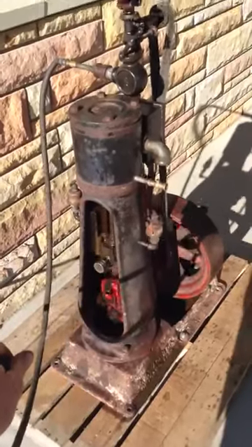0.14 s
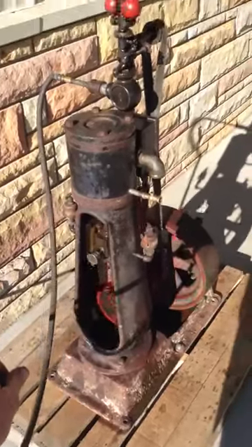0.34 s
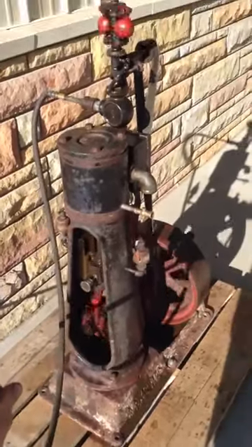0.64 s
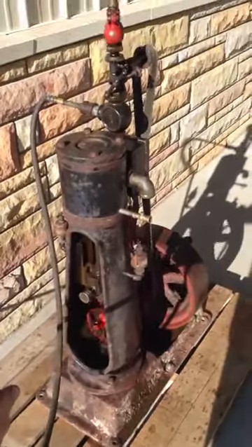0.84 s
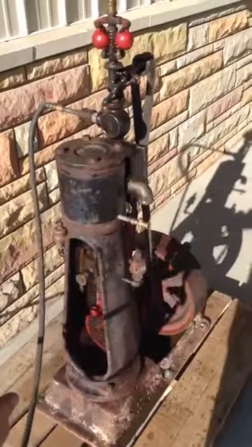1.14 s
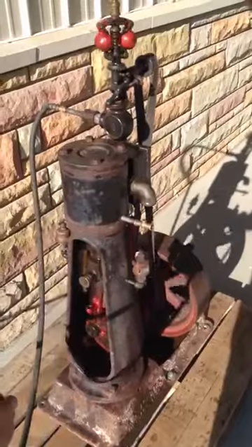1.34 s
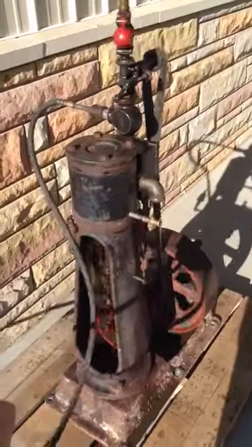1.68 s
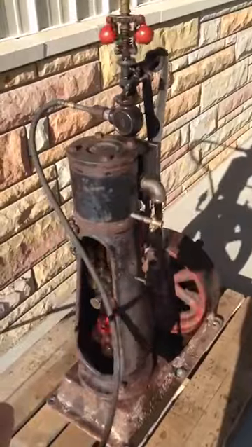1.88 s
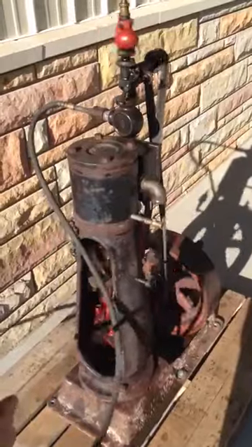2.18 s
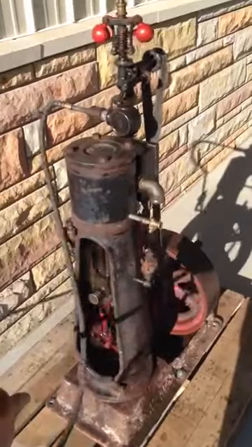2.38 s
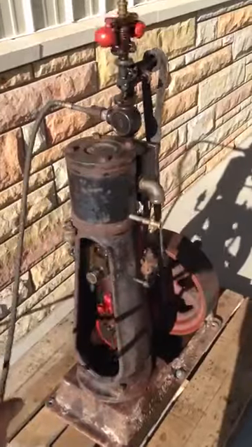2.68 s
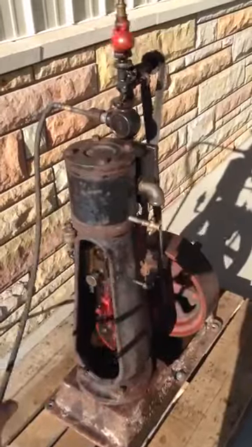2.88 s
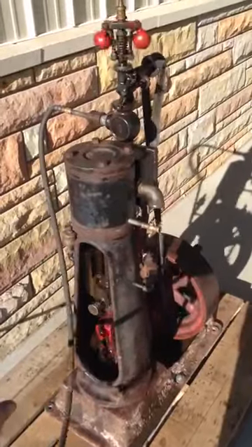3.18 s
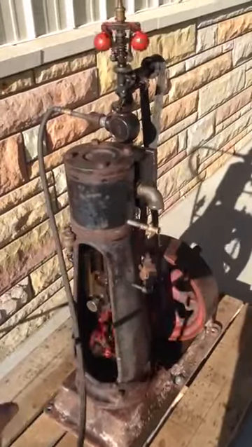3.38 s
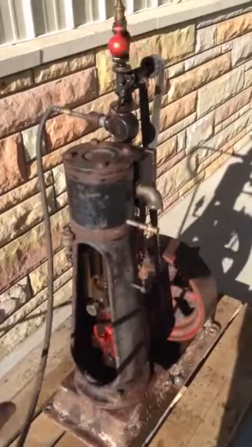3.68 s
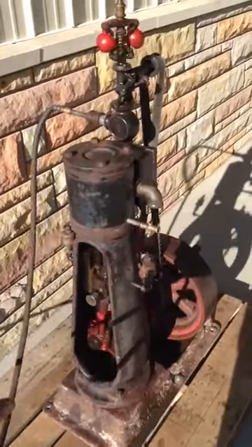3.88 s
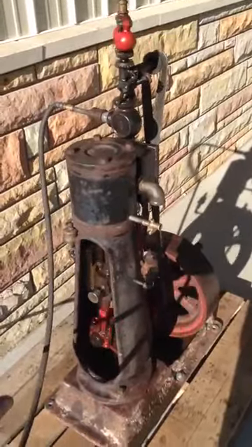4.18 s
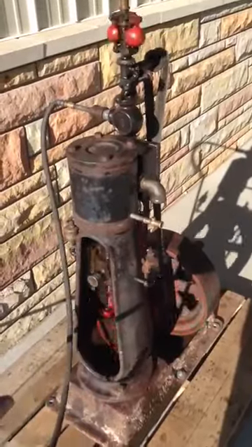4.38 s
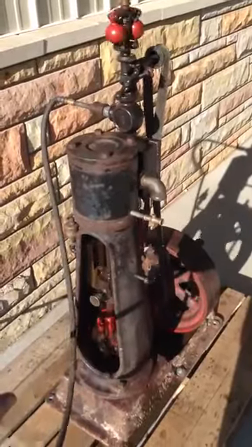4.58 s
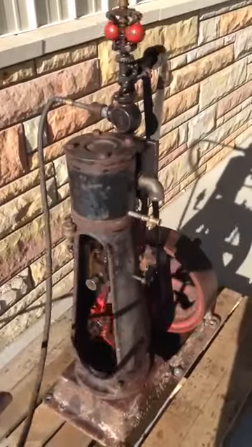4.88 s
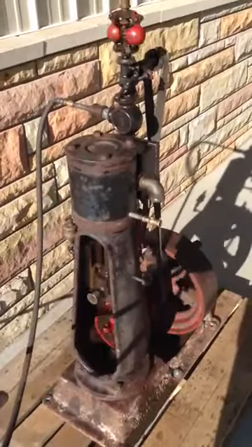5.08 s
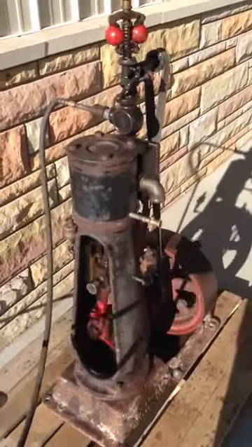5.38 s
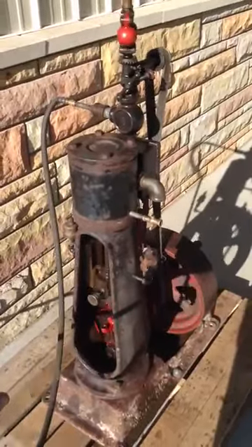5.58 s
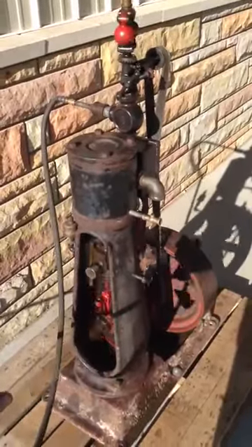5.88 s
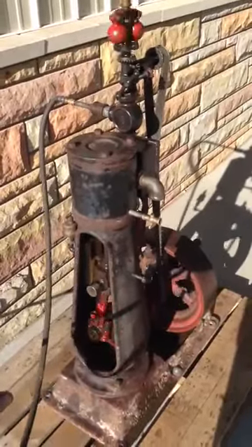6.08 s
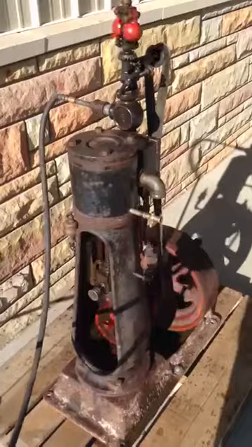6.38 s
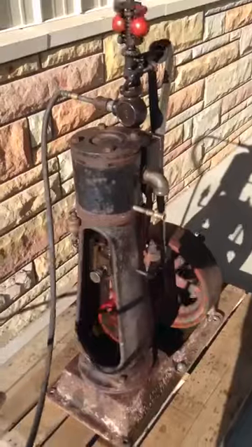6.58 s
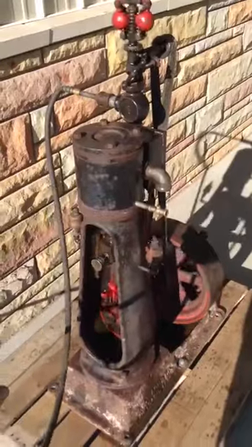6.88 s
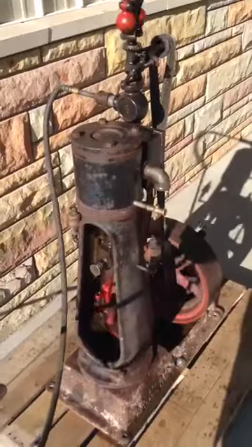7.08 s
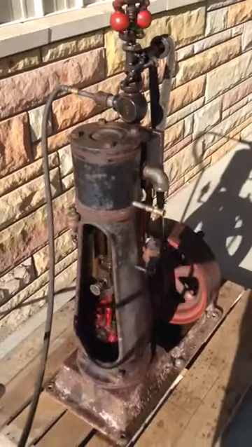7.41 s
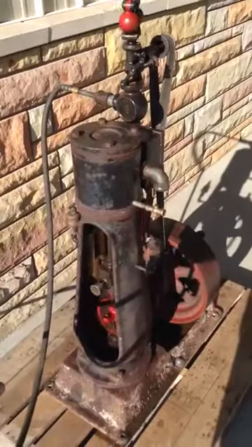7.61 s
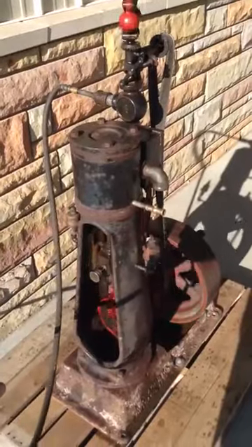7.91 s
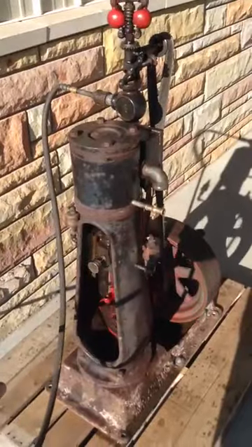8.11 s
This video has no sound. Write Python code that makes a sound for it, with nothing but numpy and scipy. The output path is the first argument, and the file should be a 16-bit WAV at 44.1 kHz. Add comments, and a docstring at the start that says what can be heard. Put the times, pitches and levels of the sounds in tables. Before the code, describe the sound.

An old single-cylinder steam engine turns over slowly with soft puffs and a thin leaking hiss. The hiss swells into a loud rush, and about eight sharp exhaust blasts spin it up fast. It then coasts, swishing, puffing and thumping ever more slowly, with a few metallic knocks and faint squeals. The leak hisses again near the end. It is heard close by, outdoors, over a faint low hum.

```python
"""An old upright single-cylinder steam engine idles over, is spun up by eight loud exhaust blasts, and coasts.
Each blast is a turbulent jet filtered by the resonances of the exhaust pipe. The piston pumps air through the
ports, swishing, puffing and thumping ever more slowly; the valve gear clacks and squeals. A leak at the valve
hisses, fades during the coast and returns. The engine's wooden pallet, the ground and a stone wall reflect the
sound, over the low hum of the yard."""
import sys
import numpy as np
from scipy import signal
from scipy.fft import rfft, irfft
from scipy.io import wavfile
from scipy.ndimage import uniform_filter1d, minimum_filter1d

SR = 44100
rng = np.random.default_rng(int(sys.argv[2]) if len(sys.argv) > 2 else 0)


def wav_out(sig):
    """Save sig, one row per channel (or a flat mono array), as 16-bit PCM at SR to the path in sys.argv[1]."""
    wavfile.write(sys.argv[1], SR, np.round(np.clip(np.atleast_2d(sig).T, -1, 1) * 32767).astype(np.int16))


N = 363825
TIME = np.arange(N) / SR
FREQS = np.maximum(np.arange(N // 2 + 1) * SR / N, 1)
REFERENCE_SPEED = 4  # turns per second

# Broad spectrum of flow through the ports. Each row: frequency in Hz, level in dB.
PORT_SPECTRUM = [(30, -42), (70, -10), (130, -3), (200, 6), (340, -3), (470, 5.5), (750, -5), (1150, 0.5),
                 (1550, -6.5), (1900, 1), (2650, -8), (3300, 4), (4400, -2.5), (5900, -7), (10300, -9),
                 (14500, -6)]
# Resonances of the ports. Each row: frequency in Hz, width in Hz, lift in dB.
PORT_MODES = [(323, 26, 7.7), (1746, 41, 12.3), (2064, 68, 8.2), (2290, 56, 8.1), (3045, 82, 4.6),
              (3510, 31, 1.8), (3660, 140, 1.8), (4010, 34, 4.2), (4900, 82, 11.5), (5278, 48, 11),
              (5750, 65, 2), (6300, 270, 4.9), (7690, 126, 9.6), (8250, 90, 4.6), (8430, 76, 7.6),
              (8960, 100, 5.3), (11530, 63, 5.7), (13700, 300, 2.1)]


def blasts(thud_db=-33, thud_lag=0.011, thud_width=0.0075, note_db=-17):
    """Sudden pressure release: a thud and a bright crack, then jet noise roars in the resonant pipe."""
    # Each row: start in seconds, crack level in dB, roar level in dB, roar fade in dB per second.
    releases = [(1.724, -11, -13.5, 82), (1.893, -7, -11.5, 46), (2.01, -10, -14.5, 27.5),
                (2.11, -11.5, -13.5, 46), (2.202, -14.5, -15.5, 46), (2.288, -13, -14.5, 62),
                (2.377, -16.5, -16, 131.5), (2.427, -24, -21, 160)]
    # Spectra of the crack and the roar. Each row: frequency in Hz, level in dB.
    crack_spectrum = [(40, -39), (200, -17), (900, -21), (2600, -0.5), (3700, 4), (6500, -6), (8200, 1.5),
                      (13000, 0.5), (15500, -19)]
    roar_spectrum = [(30, -38), (80, -37), (150, -20), (290, -3), (450, -2), (560, -13.5), (780, -2.5),
                     (1150, 2.5), (1500, -4), (2150, 3), (2650, -11.5), (3400, 2.5), (5100, 1.5),
                     (6600, -2), (15000, -6)]
    # Resonances of the hot exhaust pipe. Each row: frequency in Hz, width in Hz, lift in dB.
    pipe_modes = [(882, 14, 8), (927, 22, 9), (976, 20, 9.5), (994, 10, 15), (1402, 12, 11.5),
                  (1577, 16, 13), (1670, 27, 8.5), (1733, 56, 13.5), (1797, 32, 13), (1917, 36, 11.5),
                  (2025, 20, 7.5), (2110, 61, 7.5), (2880, 50, 11), (3170, 32, 8.5), (3470, 30, 6),
                  (3630, 38, -7), (3760, 20, 3), (3880, 110, 2), (4000, 35, -3), (5330, 20, 2),
                  (5960, 31, 7), (8050, 280, 4.5)]
    crack, roar, thud = np.zeros((3, N))
    for s, crack_db, roar_db, fade_db in releases:
        thud += from_db(thud_db + crack_db) * swell(s + thud_lag, thud_width)
        crack = np.maximum(crack, from_db(crack_db) * burst(s - .001, rise=.0049, hold=.02, fade_db=380))
        roar = np.maximum(roar, from_db(roar_db) * burst(s, rise=.0066, hold=.012, fade_db=fade_db))
    # the flow eases at dead centre and swells again as the piston gathers speed
    for s, *_ in releases[1:]:
        roar *= from_db(2.1 * swell(s + 0.065, 0.0075) - 1.9 * swell(s - .008, 0.0043))
    steam = crack * noise(colour(crack_spectrum, [(1800, 310, 11.0), (5130, 90, 11.7)]))
    steam += roar * noise(colour(roar_spectrum, pipe_modes))
    steam *= sputter(depth_db=1.5, rate_hz=57)
    return steam + from_db(note_db) * roar * pipe_note() + thud * noise(resonance(45, 45) ** 2)


def first_steam():
    """Flow excites resonators: ahead of the blasts, steam blows through the ports and the pipe sings."""
    # In order: start in seconds, port level in dB, note level in dB, hold in seconds, fade in dB/s.
    opening = (1.5, -36, -32, .065, 120)
    s, port_db, note_db, hold, fade_db = opening
    gust = burst(s, rise=0.03, hold=hold, fade_db=fade_db)
    ports = from_db(port_db) * noise(colour(PORT_SPECTRUM, PORT_MODES))
    return gust * (ports + from_db(note_db) * pipe_note())


def piston():
    """Flow noise grows with speed: twice a turn, pumped air swishes in the ports and sounds the pipe."""
    # Valve timing, bottom centre at one half. Each row: share of a turn, flow in dB, pipe note in dB.
    valve_timing = [(.02, 1, -6), (.13, -2, 0.5), (.27, 3, 9), (.38, 1.5, 3.5), (.48, 1.5, 4),
                    (.62, -5.5, -3), (.655, 2.5, 6), (.73, 1.5, 4), (.85, -2.5, 2.5), (.945, -9.5, -5)]
    flow_db, note_db = each_turn(valve_timing)
    s, strength_db, speed = crank()
    strength_db = np.interp(TIME, s, strength_db)
    doublings = np.interp(TIME, s, np.log2(speed / REFERENCE_SPEED))
    swish_db = -35 + 10.5 * doublings + strength_db + flow_db
    whistle_db = -45.5 + 12.5 * doublings + strength_db + note_db
    ports = rfft(noise(colour(PORT_SPECTRUM, PORT_MODES)))
    # each group of port resonances flutters on its own; the fine hiss above them wavers more slowly
    edges_hz = [0, 750, 1500, 2700, 4400, 6000]
    swish = irfft(ports * (FREQS >= edges_hz[-1]), N) * sputter(depth_db=3.0, rate_hz=18)
    for low, high in zip(edges_hz, edges_hz[1:]):
        swish += irfft(ports * (FREQS >= low) * (FREQS < high), N) * sputter(depth_db=2.4, rate_hz=70)
    return from_db(swish_db) * swish + from_db(whistle_db) * pipe_note()


def puffs(widening_exponent=0.29):
    """Trapped air expands at each dead centre; slow strokes leak more and give weaker, longer puffs."""
    # Top centre, then bottom. Each row: air level in dB, pipe bark in dB, width in seconds at the
    # reference speed, speed in turns per second at which half the air leaks away.
    kinds = [(-31.5, -31.5, 0.0045, 2.33), (-26, -37.5, 0.013, 3.34)]
    air, bark = np.zeros((2, N))
    for k, (s, strength_db, speed) in enumerate(zip(*crank())):
        air_db, bark_db, width, leaky_speed = kinds[k % 2]
        trapped = 1 / (1 + (leaky_speed / speed) ** 2)
        width *= (REFERENCE_SPEED / speed) ** widening_exponent
        opening = from_db(strength_db) * trapped * swell(s, width)
        air += from_db(air_db) * opening
        bark += from_db(bark_db) * opening
    pipe = resonance(1784, 136) ** 2 + 0.85 * resonance(2043, 105) ** 2
    spit = colour([(30, -34), (70, -23), (200, 4.0), (700, -17), (2600, -5), (3400, 5.5), (6200, -7.0),
                   (8500, -2.5), (15000, -5.5)], PORT_MODES)
    return air * noise(spit) + bark * noise(pipe)


def thumps(width=.011, note_hz=300, glide_hz_per_s=1500, detuning=.06, db_per_doubling=7.3):
    """Cavity resonance: at dead centre, turbulence and a note rising as the piston shrinks the space."""
    # Top centre, then bottom. Each row: note and rumble levels in dB at the reference speed,
    # lag in seconds, advance in seconds for each turn per second.
    kinds = [(-42, -44, .027, .0065), (-33.5, -43, .012, .001)]
    note, rumble = np.zeros((2, N))
    for k, (s, strength_db, speed) in enumerate(zip(*crank())):
        note_db, rumble_db, lag, advance = kinds[k % 2]
        peak = s + lag - advance * speed
        start_cycles, detune = rng.uniform(-1.08, 1, 2)
        if speed > .9:  # any slower and no pressure builds up
            near = around(peak, width)
            age = TIME[near] - peak
            push_db = strength_db + db_per_doubling * np.log2(speed / REFERENCE_SPEED)
            push = from_db(push_db) * swell(peak, width)[near]
            hz = note_hz * (1 + detuning * detune)
            cycles = start_cycles + hz * age + .5 * glide_hz_per_s * age ** 2
            note[near] += from_db(note_db) * push * np.sin(2 * np.pi * cycles)
            rumble[near] += from_db(rumble_db) * push
    hollow = colour([(40, -40), (100, -22), (180, -4), (320, -7.5), (480, -11), (700, -32), (2000, -50)])
    return note + rumble * noise(hollow)


def escaping_steam(leak_rush_db=-12.5):
    """Jet noise: the valve leak hisses, the open throttle adds a broad rush, a gland seeps steadily."""
    # Flow through the leak and the throttle. Each row: time in seconds, level in dB.
    leak_curve = [(0, -41), (.15, -41), (.5, -38.5), (1.0, -39), (1.41, -34.5), (1.51, -28), (1.72, -29),
                  (2.6, -36.5), (4.0, -51), (6.27, -63), (6.36, -47), (6.47, -40), (6.66, -41.5),
                  (6.85, -37.5), (7.5, -39), (8.25, -37.5)]
    throttle_curve = [(0, -45.5), (.6, -44.5), (.76, -39), (1.05, -42), (1.28, -39), (1.39, -48),
                      (1.46, -34.5), (1.52, -22.5), (1.63, -26), (1.72, -25.5), (2.3, -32), (2.58, -64),
                      (4.5, -87)]
    # Spectra of the thin hiss and the broad rush. Each row: frequency in Hz, level in dB.
    leak_spectrum = [(880, -55), (1500, -20), (2250, -30), (3230, -19.5), (5940, -9), (7570, -6),
                     (11000, -2), (14100, -0.5), (15200, -1)]
    rush_spectrum = [(40, -32), (100, -25), (200, -14), (480, -8), (650, -25), (950, -13), (1550, -12),
                     (1900, -3), (2700, -7.5), (5200, 0.5), (11000, 1.5), (15000, -1)]
    leak_db = np.interp(TIME, *np.transpose(leak_curve))
    throttle_db = np.interp(TIME, *np.transpose(throttle_curve))
    leak = from_db(leak_db) * noise(colour(leak_spectrum, [(8500, 150, 5.7), (11200, 130, 3)]))
    flow = np.hypot(from_db(throttle_db), from_db(leak_db + leak_rush_db))  # the powers add
    rush_modes = [(1303, 19, 8.4), (4450, 60, 2.8), (5550, 120, 2.2), (6270, 60, 6.4)]
    rush = flow * noise(colour(rush_spectrum, rush_modes))
    seep = from_db(-58.0) * noise(resonance(13600, 2500) ** 2)
    return (leak + rush) * sputter(depth_db=1.0, rate_hz=15) + seep


def knocks():
    """Impact excitation: the valve gear clacks as it reverses, and other sharp blows ring the iron frame; a
    softer blow is duller. At 2.49 s a bright, sharp spit of steam cracks with the same hard timbre."""
    # Each row: start in seconds, level in dB, hardness as a cut-off in Hz.
    impacts = [(0.71, -43.5, 1490), (1.552, -40, 600), (2.352, -31, 450), (2.491, -29.5, 9000),
               (4.987, -47, 7900), (5.254, -48, 8000), (5.458, -37, 9500), (6.083, -38, 9050),
               (7.158, -54.5, 3500)]
    # Resonances of the frame. Each row: frequency in Hz, width in Hz, lift in dB.
    frame_modes = [(466, 29, 11.5), (1160, 71, 10.5), (1750, 70, 10), (1930, 70, -5), (2256, 81, 16),
                   (3200, 120, 14.5), (3760, 130, 13.5), (4180, 90, 12), (5170, 81, 2), (7154, 150, 3)]
    body = colour([(30, -36), (90, -10.5), (250, -0.5), (700, -3), (1500, -8.5), (4000, -6),
                   (7000, -4.0), (15000, -8)], frame_modes)
    out = np.zeros(N)
    for s, db, hardness_hz in impacts:
        force = from_db(db) * burst(s, rise=0.0035, hold=0.011, fade_db=700)
        out += force * noise(body / np.sqrt(1 + (FREQS / hardness_hz) ** 4))
    return out * sputter(depth_db=3.0, rate_hz=480)


def squeals():
    """Narrow-band oscillation: gaps in the valve gear sing briefly, most gliding up or down in pitch."""
    # Each row: peak time and width in seconds, pitch in Hz, glide in Hz/s, bandwidth in Hz, level in dB.
    chirps = [(1.677, 0.012, 10480, -45000, 693, -18), (6.101, 0.0098, 4654, 0, 50, -46),
              (6.24, 0.031, 3530, -1200, 220, -57), (6.323, 0.014, 3400, -500, 39.6, -53.5),
              (7.89, 0.032, 4920, 1003, 100, -54), (7.93, 0.027, 3910, 1798, 109, -58)]
    out = np.zeros(N)
    for s, width, hz, glide, band_hz, db in chirps:
        waver = noise(1 / (1 + (2 * FREQS / band_hz) ** 2))
        phase = 2 * np.pi * np.cumsum(hz + glide * (TIME - s)) / SR
        out += from_db(db) * swell(s, width) * waver * np.sqrt(2) * np.sin(phase)
    return out


def last_sigh(level_db=-49):
    """Pipe resonance: on the slowest turn the port opens gently and the pipe sounds for longer."""
    pipe = resonance(1810, 160) ** 2 + resonance(2070, 150) ** 2
    return from_db(level_db) * burst(7.82, rise=.01, hold=.05, fade_db=100) * noise(pipe)


def pipe_note():
    """A sharp resonance narrows turbulence to the exhaust pipe's breathy note; rms 1."""
    return noise(resonance(1028, 24) ** 2)


def beside_wall(x):
    """Early reflections off pallet, ground and wall join the direct sound, with a faint diffuse tail."""
    # Each row: delay in seconds, gain as a ratio.
    echoes = [(.00345, 0.1), (.0054, 0.18), (.0071, 0.11), (.0084, 0.13), (0.0116, .1), (0.0159, 0.13)]
    near = sum(gain * np.interp(TIME - delay, TIME, x, left=0) for delay, gain in echoes)
    tail = rng.standard_normal(N) * burst(0.016, rise=0.022, hold=0.012, fade_db=195)
    return x + near + from_db(-20) * signal.fftconvolve(x, tail / np.linalg.norm(tail))[:N]


def yard(level_db=-58):
    """Ambient noise: a steady hum with most of its power at low frequencies."""
    # Each row: frequency in Hz, level in dB.
    spectrum = [(25, -46), (60, -19), (120, -7), (210, 4), (400, -14.5), (600, -9), (950, -3),
                (1500, -11.5), (3000, -9), (15000, -50)]
    return from_db(level_db) * noise(colour(spectrum))


def crank():
    """Rotation sets the rhythm: time, strength and turns per second at top and bottom centre in turn."""
    # Each row: time in seconds, strength in dB relative to what the speed alone gives.
    top_centres = [(-.3, 0), (.277, 0), (.929, -5), (1.725, -1), (2.012, 1), (2.204, 1.5), (2.379, 4.5),
                   (2.552, 0.5), (2.725, -1), (2.915, 0.5), (3.112, 1.5), (3.328, 0.5), (3.561, 0.5),
                   (3.805, -0.5), (4.086, 0), (4.391, 0), (4.741, -1), (5.158, 0), (5.672, -1),
                   (6.393, -3.5), (7.86, -8)]
    bottom_centres = [(.008, 0), (.523, 0.5), (1.335, -9), (1.895, 5), (2.102, 2.5), (2.29, -0.5),
                      (2.465, -0.5), (2.622, 0.5), (2.813, -0.5), (3.004, 1), (3.205, 1), (3.427, 0.5),
                      (3.671, -0.5), (3.923, -0.5), (4.215, -1), (4.535, 0.5), (4.919, 0), (5.363, -1.5),
                      (5.956, -1), (6.84, -1.5), (9.3, -4)]
    s, strength_db = np.reshape(list(zip(top_centres, bottom_centres)), (-1, 2)).T
    tops = s[::2]
    mid_turns = (tops[1:] + tops[:-1]) / 2
    return s, strength_db, np.interp(s, mid_turns, 1 / np.diff(tops))


def each_turn(rows):
    """Periodicity in crank angle: a pattern stretches over every turn, however long it takes."""
    share, *columns = np.transpose(rows)
    s, _, _ = crank()
    turns = np.interp(TIME, s, np.arange(len(s)) / 2)
    return [np.interp(turns, share, column, period=1) for column in columns]


def from_db(db):
    """Decibels to amplitude gain."""
    return 10 ** (np.asarray(db) / 20)


def resonance(hz, width_hz):
    """Frequency response of a damped oscillator, 1 at its peak."""
    return 1 / (1 + 1j * (FREQS ** 2 - hz ** 2) / (FREQS * width_hz))


def noise(response):
    """Source and filter: white noise heard through a frequency response; rms 1."""
    x = irfft(rfft(rng.standard_normal(N)) * response, N)
    return x / np.sqrt(np.mean(x ** 2) + 1e-20)


def colour(spectrum, modes=()):
    """A broad spectrum of (Hz, dB) points, shaped by resonances of (Hz, width in Hz, lift in dB)."""
    hz, db = np.transpose(spectrum)
    lift = sum((from_db(2 * lift_db) - 1) * abs(resonance(f, w)) ** 2 for f, w, lift_db in modes)
    return from_db(np.interp(np.log(FREQS), np.log(hz), db)) * np.sqrt(np.maximum(1 + lift, .1))


def sputter(depth_db, rate_hz):
    """Random amplitude modulation, as in a wet jet; a gain."""
    return from_db(depth_db * noise(1 / (1 + (FREQS / rate_hz) ** 2)))


def around(s, width):
    """The samples within five widths of a moment."""
    return slice(*np.searchsorted(TIME, [s - 5 * abs(width), s + 5 * abs(width)]))


def swell(s, width):
    """A Gaussian envelope, with centre and width in seconds."""
    out, near = np.zeros(N), around(s, width)
    out[near] = np.exp(-.5 * ((TIME[near] - s) / width) ** 2)
    return out


def burst(s, rise, hold, fade_db):
    """A linear rise, then exponential decay at fade_db per second from hold seconds after the start."""
    age = TIME - s
    return np.clip(age / rise, 0, 1) * from_db(-np.clip(fade_db * (age - hold), 0, 200))


def scene():
    """Superposition: the engine, its reflections and the yard add up, alike in both channels."""
    steam = escaping_steam() + first_steam() + blasts() + last_sigh()
    motion = piston() + puffs() + thumps() + knocks() + squeals()
    background = yard()
    return np.tile(beside_wall(steam + motion) + background, (2, 1))


def record(dry):
    """Band and peak limiting: the deep bass is thinned, the loudest blasts held down, the top cut."""
    low_cut_hz, high_cut_hz = 61, 15300
    ceiling, window = .8, int(.006 * SR)
    dry = signal.sosfilt(signal.butter(1, low_cut_hz, "high", fs=SR, output="sos"), dry)
    allowed = np.minimum(1, ceiling / (abs(dry).max(axis=0) + 1e-9))
    gain = uniform_filter1d(minimum_filter1d(allowed, size=2 * window), size=window)
    return signal.sosfilt(signal.ellip(12, .1, 90, high_cut_hz, fs=SR, output="sos"), gain * dry)


dry = scene()
out = record(dry)
wav_out(out)
```